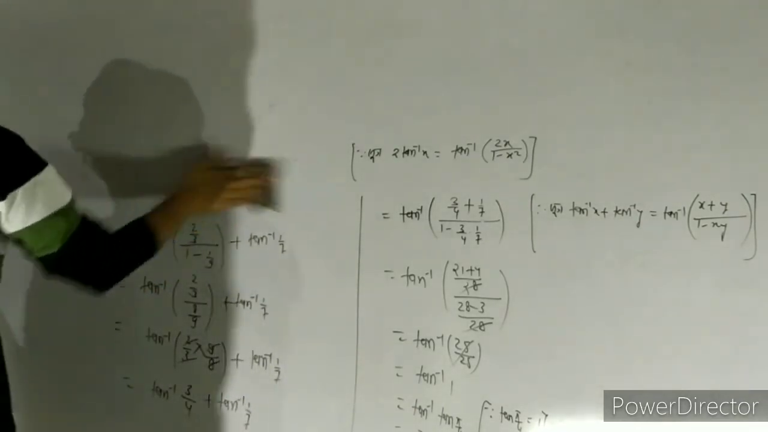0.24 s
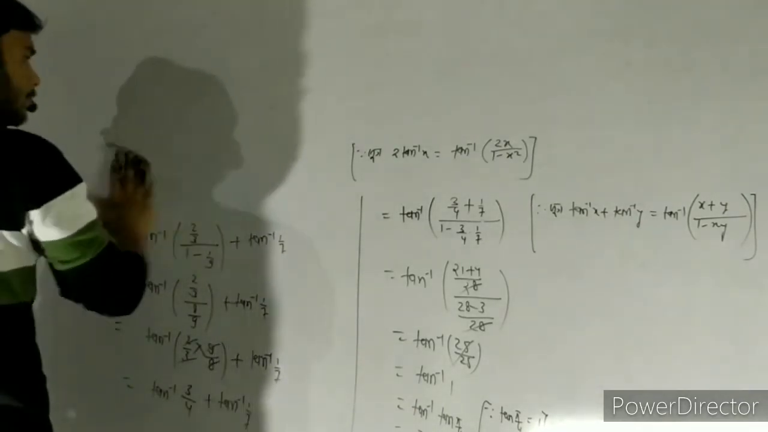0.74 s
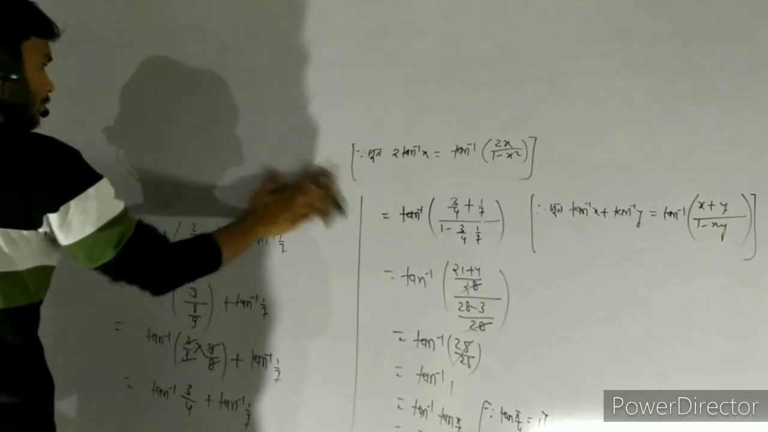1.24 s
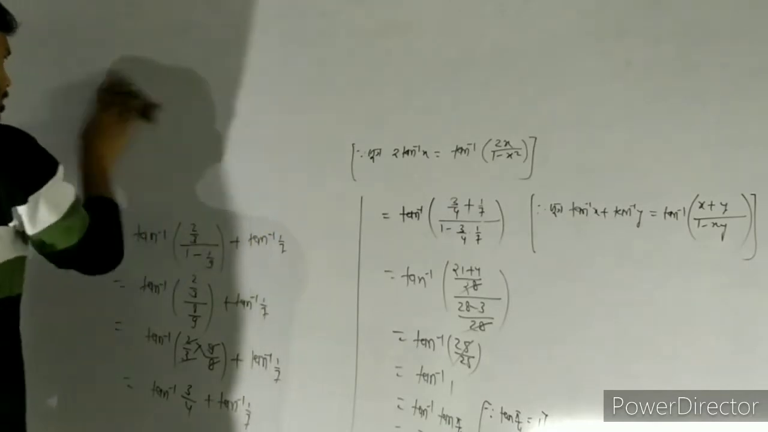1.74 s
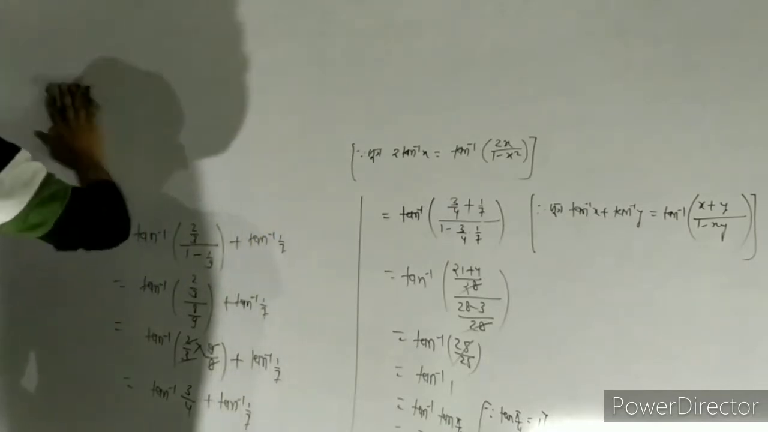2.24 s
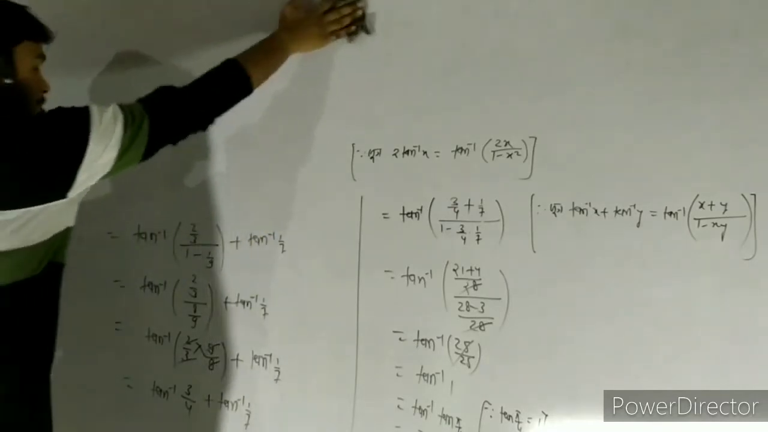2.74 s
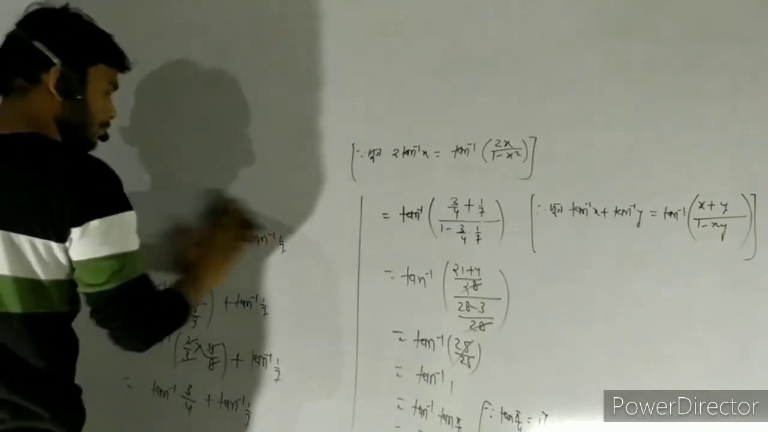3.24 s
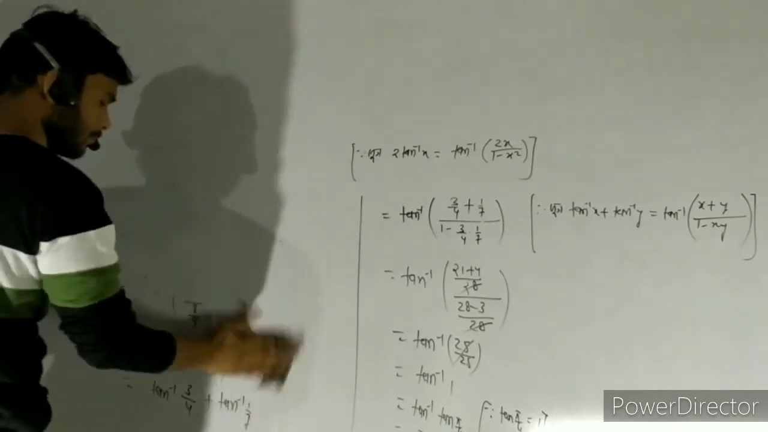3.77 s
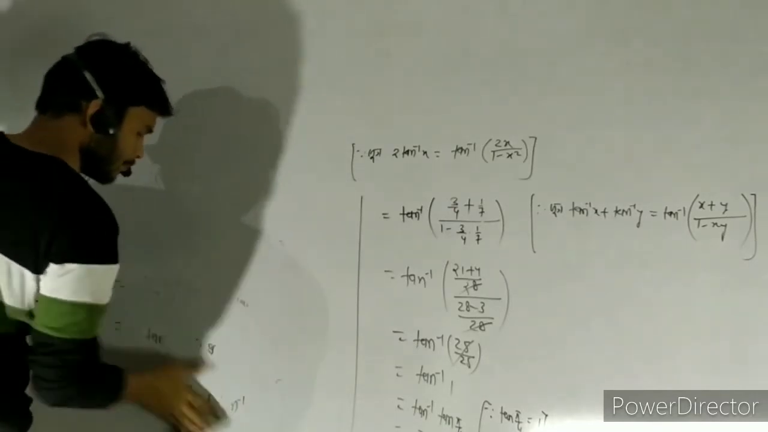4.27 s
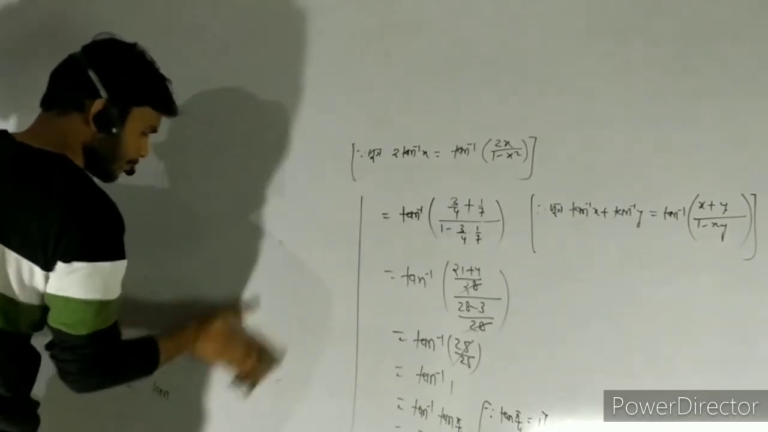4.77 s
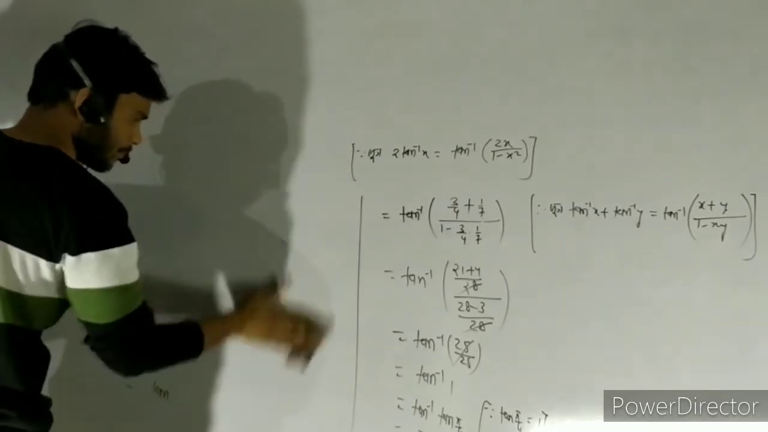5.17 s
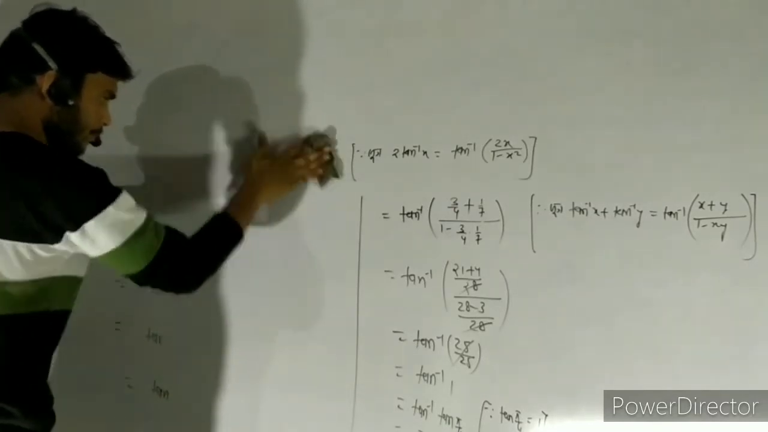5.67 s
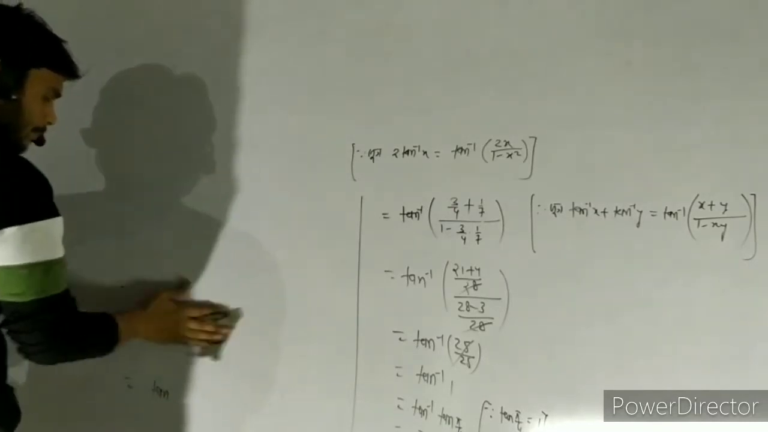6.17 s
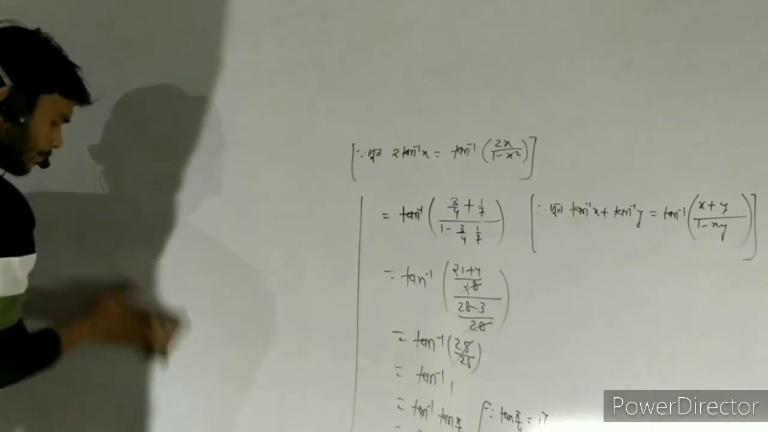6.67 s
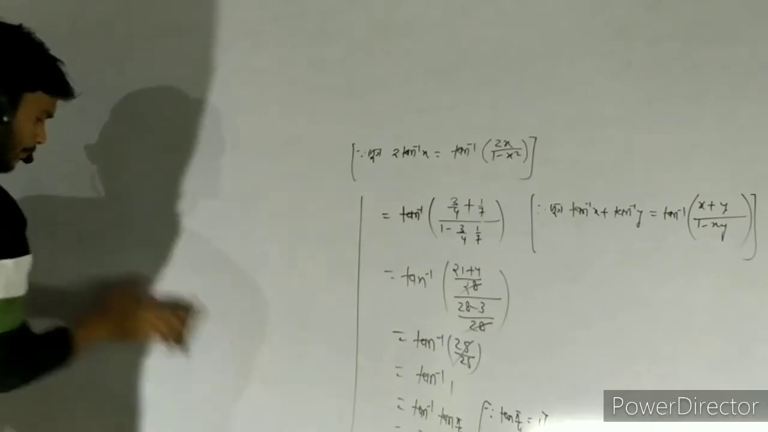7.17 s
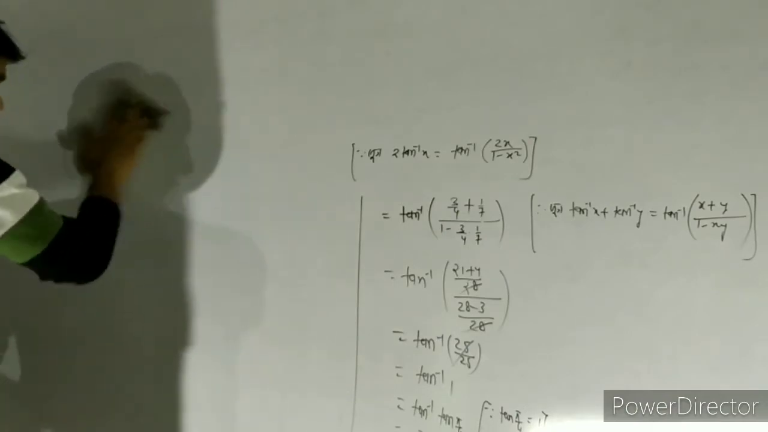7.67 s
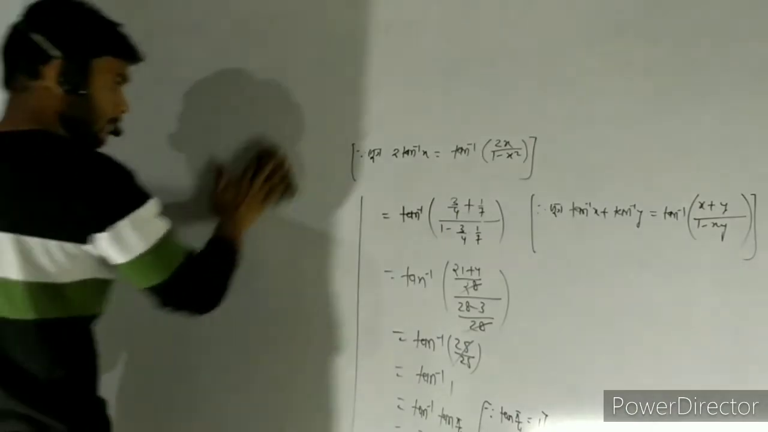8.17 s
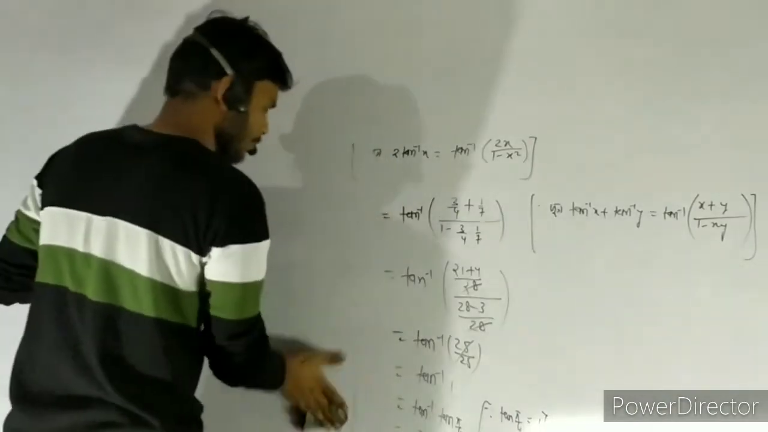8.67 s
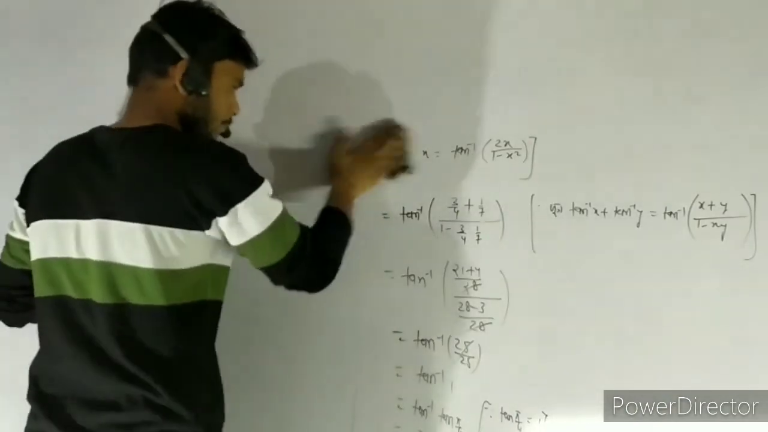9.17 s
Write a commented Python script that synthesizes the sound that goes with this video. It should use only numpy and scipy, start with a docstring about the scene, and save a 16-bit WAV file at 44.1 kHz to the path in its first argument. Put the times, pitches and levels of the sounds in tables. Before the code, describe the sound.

A cloth duster rubs a whiteboard in short, uneven strokes, each a dry hiss over the low, hollow resonance of the board. Light knocks and sharp ticks fall among the strokes. About two thirds through comes one brief harsh scrape, then the loudest flurry of scrubbing and knocking, before lighter wiping resumes. A small microphone worn by the person wiping picks it up closely, with faint hum and hiss in the pauses.

```python
"""A cloth scrubs a whiteboard in uneven strokes, heard through a small microphone worn by the wiper.
Stick-slip friction drives a low panel, its body and a hollow shell that resonates near 870 Hz,
while the cloth's fibres hiss in the treble. Knocks excite the same resonances impulsively.
Sharp ticks and one harsh scrape lie on top; a faint hum and hiss fill the pauses."""
import sys
import numpy as np
from scipy import signal
from scipy.fft import rfft, irfft, next_fast_len
from scipy.io import wavfile
from scipy.ndimage import uniform_filter1d, map_coordinates

SR = 44100
rng = np.random.default_rng(int(sys.argv[2]) if len(sys.argv) > 2 else 0)


def generate_wav(signal):
    """Clip the signal to [-1, 1] and save it as 16-bit WAV at the path in sys.argv[1]."""
    frames = np.transpose(np.atleast_2d(signal))
    scaled = np.clip(frames, -1, 1) * 32767
    pcm = np.round(scaled).astype(np.int16)
    wavfile.write(sys.argv[1], SR, pcm)


N = 414981

# Partials of the hum: pitch_hz, level_db
HUM_PARTIALS = [(199, -95), (590, -95.5)]
# Spectral shapes of the background hiss, scrape, panel, body and fibres: frequency_hz, density_db
FLOOR_SPECTRUM = [(18, -31.5), (30, -3.5), (368, 1), (588, 2), (670, -17), (826, -5), (15400, -17.5)]
SCRAPE_SPECTRUM = [(880, -49), (1500, -17), (1850, -1.5), (2480, -13.5), (3320, -40), (4010, -1.5),
                   (6000, -3.5), (7570, -14), (9000, -12), (12500, -26)]
PANEL_SPECTRUM = [(15, -49.5), (30, -21.5), (46, -6.5), (70, -2.5), (110, -9), (150, -17.5), (280, -44.5)]
BODY_SPECTRUM = [(50, -28), (95, -6.5), (135, -0.5), (220, -2.5), (400, -7), (600, -13.5), (1000, -55)]
FIBRE_SPECTRUM = [(1120, -29.5), (1900, -6), (2500, -8.5), (3160, -4), (3660, -7), (4840, -7.5), (6130, -2),
                  (7980, -6), (8940, -12), (11000, -13.5), (15400, -54)]
# Modes of the hollow shell: centre_hz, bandwidth_hz, gain_db
SHELL_MODES = [(880, 84.5, 2.5), (660, 412, -10), (1798, 210, -13), (1087, 343, -11)]
# One harsh drag: start_s, start_db, end_db
SCRAPE_DRAG = (6.452, -45.5, -37.5)
# Catches of the cloth: start_s, level_db, centre_hz, decay_ms
CLOTH_CATCHES = [(0.472, -43, 3400, 0.98), (1.0006, -34.5, 6300, 1.4), (1.4885, -38, 4800, 1),
                 (1.8095, -35.5, 4000, 0.8), (1.819, -24, 6200, 0.63), (2.149, -26.5, 6500, 0.24),
                 (2.3455, -36, 5070, 0.6), (3.217, -37.5, 6300, 0.65), (3.5061, -50, 2500, 1),
                 (4.062, -45, 2300, 0.8), (4.2293, -45, 2470, 0.8), (4.3445, -34, 2780, 1),
                 (4.516, -44, 2830, 1), (4.594, -40.5, 2300, 0.83), (5.7814, -44, 6900, 0.88),
                 (6.112, -48, 6000, 2.6), (6.1719, -38.5, 4800, 3.7), (6.24, -36.5, 6090, 16),
                 (6.754, -42.5, 5770, 1), (6.9706, -29, 6100, 5.4), (7.159, -26.5, 6090, 5.1),
                 (7.1806, -24, 6060, 6.1), (7.1972, -21, 6450, 2.16), (7.228, -14, 6200, 2.5),
                 (7.598, -40, 2060, 0.71), (7.703, -38.5, 7400, 4.4), (7.722, -40.5, 7730, 4),
                 (8.513, -30, 5880, 12), (8.897, -43.5, 4770, 1)]
# Knocks, with a thud gain for panel and body: start_s, level_db, thud_db
IMPACTS = [(0.472, -46.5, -6), (0.659, -54, 12), (1.236, -27.5, -11), (1.488, -37, -24), (2.148, -28, -8),
           (2.436, -25, 5), (2.449, -36.5, 22.5), (2.822, -53.5, 14), (3.19, -60, 11), (3.504, -37, -14),
           (4.228, -35.5, -16), (4.343, -25.5, -9), (5.782, -43, -5.5), (5.826, -47, 1.5),
           (6.198, -27, -15.5), (6.381, -23, -22), (6.452, -31, -11), (6.584, -20.5, -18),
           (6.756, -34.5, -21), (6.841, -37.5, 9), (6.888, -23, -13), (6.975, -17, 6), (7.02, -15.5, -9),
           (7.037, -13, -2), (7.139, -20, 0), (7.182, -15.5, -15), (7.197, -10.5, -2), (7.206, -15, -6.5),
           (7.231, -15, -17.5), (7.569, -35, -14), (7.596, -25, -9), (8.123, -35, 4), (8.453, -37, -6),
           (8.478, -36, 13.5), (8.511, -27, -2), (8.69, -39, -10), (8.894, -33.5, -4)]
# How strongly each part answers a knock: panel_db, body_db, shell_db
IMPACT_COUPLING = (14, 3, 11.5)
# Strokes of the cloth:
# start_s, length_s, hiss_db, swell_db, panel_above_hiss_db, shell_above_hiss_db, rise_db_per_s
WIPES = [(-0.029, 0.092, -56.5, -18.5, 3, 3, 120), (0.21, 0.15, -75, -9, -4, 5, 240),
         (0.38, 0.045, -75, 6, 6, 5, 460), (0.479, 0.082, -63, 0.5, -1, 3.0, 523),
         (0.675, 0.08, -73, 2, -5, 3.5, 770), (0.795, 0.18, -65.5, 13.5, 3.5, 4, 270),
         (1.019, 0.23, -50.5, 6, -5.5, 1.5, 244), (1.27, 0.12, -71.5, 23, 4.5, 0.5, 130),
         (1.507, 0.065, -50.5, -1.5, -4, 1, 540), (1.613, 0.02, -67, 2, 13.5, 1, 410),
         (1.714, 0.15, -56, -4.5, 4, 1, 204), (2.102, 0.12, -56.5, 3, 1.5, 0.5, 342),
         (2.36, 0.12, -50, 18.5, 2, 1, 478), (2.52, 0.22, -72, -18, 1, -1.5, 251),
         (2.855, 0.06, -65.5, -12, 4, -1, 410), (3.036, 0.071, -68.5, -16, 0.5, -4, 384),
         (3.218, 0.11, -62.5, 3, 4.5, 1.5, 442), (3.378, 0.086, -72, -22, 8, 0.5, 390),
         (3.442, 0.19, -69.5, 2.5, 4, -0.5, 270), (3.728, 0.19, -75, 7, 2, 0, 300),
         (4.034, 0.033, -62, -1, -4, 0, 640), (4.071, 0.086, -70, -4, -1, -0.5, 300),
         (4.233, 0.049, -61.5, 2.5, 1, 0.5, 618), (4.337, 0.12, -41, 6.5, -8, -3, 486),
         (4.508, 0.36, -64.5, -12, 5.5, 2.5, 432), (4.917, 0.18, -68, 9, 0, 0.5, 178),
         (5.158, 0.24, -82.5, -13, -15, -1.5, 803), (5.46, 0.058, -87.5, 17, -13, 0.5, 1050),
         (5.609, 0.017, -71, -1, 4, -1.5, 317), (5.807, 0.1, -74, -18.5, -0.5, 0.5, 425),
         (5.96, 0.1, -73.5, 24.5, -5, -4, 940), (6.109, 0.09, -56.5, 11.5, 4.5, 1, 888),
         (6.257, 0.18, -52, -14, -1.5, 3.5, 192), (6.456, 0.11, -52.5, 1, -3.5, 9.5, 690),
         (6.584, 0.038, -41.0, 3, -1, 3, 577), (6.658, 0.17, -63.5, -8, 5, 0.5, 1262),
         (6.847, 0.083, -50.5, 6.5, 9, 2.5, 338), (6.961, 0.08, -43, 15, 6, 5, 617.5),
         (7.137, 0.066, -41.5, 8, 14.5, 5, 821.5), (7.236, 0.068, -36, -15.5, 3, -2.5, 405),
         (7.416, 0.076, -75.5, -6, 5, 1, 256), (7.522, 0.13, -56.5, 10, -1.5, 0.5, 350),
         (7.707, 0.073, -52.5, 0.5, 5, 1, 912), (7.802, 0.094, -66.5, -11.5, 4.5, 1, 109),
         (8.077, 0.091, -54.5, 2, 6, 3, 228), (8.316, 0.1, -68, -6, -4.5, 1.5, 409),
         (8.483, 0.035, -48.0, 8, 6.5, 5, 383), (8.603, 0.1, -53, -7.5, 3.5, -0.5, 357),
         (8.794, 0.054, -66.5, -5, -2, -1.5, 320), (8.938, 0.11, -58.5, -21.5, 2.5, -1, 318),
         (9.077, 0.19, -63, 11.5, 2.5, -1.5, 340), (9.315, 0.077, -60.5, 4.5, 4, 5, 200)]

FLOOR_DB = -81
SWELL_S, SWELL_DB, SWELL_RISE_DB_PER_S, SWELL_FALL_DB_PER_S = 4.77, 21, 150, 26  # the hum's one swell
SCRAPE_S, CONTACT_S = 0.097, 0.00037  # durations of the drag and of a knock's push
FALL_RATIO = 0.84  # a stroke's rate of fall over its rate of rise
SHELL_DRIFT = 0.025  # share by which the shell's ringing pitch wanders at random
PRESSED_HZ, PRESSED_DB, PRESSED_LOSS = 4180, -55, 0.22  # hiss compression: corner, threshold, dB per dB
MIC_HZ, BAND_LIMIT_HZ = 11000, 15500


def amp(db):
    """Amplitude ratio of a level in decibels."""
    return 10 ** (np.asarray(db) / 20)


def unit(x):
    """Normalisation to an rms of 1."""
    return x / np.sqrt(np.mean(x ** 2) + 1e-20)


def wobble(rate_hz):
    """Random modulation: a spline through rate_hz Gaussian values a second."""
    knots = rng.standard_normal(int(N * rate_hz / SR) + 4)
    return map_coordinates(knots, [np.arange(N) * rate_hz / SR])


def filtered(x, response):
    """Linear filtering: the spectrum of x times a frequency response."""
    size = next_fast_len(N + SR // 2)
    return irfft(rfft(x, size) * response(np.fft.rfftfreq(size, 1 / SR)), size)[:N]


def causal(spectrum):
    """Minimum-phase response of unit power gain: it never precedes its excitation."""
    def response(hz):
        points_hz, db = np.transpose(spectrum)
        magnitude = amp(np.interp(np.log(hz + 1), np.log(points_hz + 1), db))
        cepstrum = irfft(np.log(magnitude + 1e-6))
        half = len(cepstrum) // 2
        gain = np.exp(rfft(np.r_[cepstrum[0], 2 * cepstrum[1:half], np.zeros(len(cepstrum) - half)]))
        return gain / np.sqrt(np.mean(abs(gain) ** 2))
    return response


def patchy(depth_db):
    """Modulated white noise: its gain varies in random patches of time and frequency."""
    spectra = signal.stft(rng.standard_normal(N), nperseg=256)[2]
    patches = uniform_filter1d(uniform_filter1d(rng.standard_normal(spectra.shape), 8, 0), 10, 1)
    return unit(signal.istft(spectra * amp(depth_db * unit(patches)), nperseg=256)[1][:N])


def grit(rate_hz, spread_db):
    """Shot noise: tiny slips at random moments, most small, a few large."""
    slips = rng.random(N) < rate_hz / SR
    sizes = amp(spread_db * np.minimum(rng.exponential(size=N), 3.5))
    return unit(slips * sizes * rng.choice([-1, 1], N))


def background():
    """Noise floor: faint hiss and a hum, modulated in amplitude and phase, that swells once."""
    t = np.arange(N) / SR
    hum = sum(amp(db + 4 * wobble(14)) * np.sin(2 * np.pi * hz * t + 2.4 * wobble(40))
              for hz, db in HUM_PARTIALS)
    below_peak_db = np.where(t < SWELL_S, SWELL_RISE_DB_PER_S, SWELL_FALL_DB_PER_S) * abs(t - SWELL_S)
    hiss = amp(FLOOR_DB + 1.4 * wobble(4.4)) * filtered(patchy(depth_db=5.0), causal(FLOOR_SPECTRUM))
    return hum * amp(np.maximum(SWELL_DB - below_peak_db, 0)) + hiss


def scrape():
    """Friction noise: one gritty drag that starts and stops abruptly."""
    start, start_db, end_db = SCRAPE_DRAG
    end = start + SCRAPE_S
    corners_s = [start - .002, start, end, end + 0.011]
    level_db = np.interp(np.arange(N) / SR, corners_s, [-120, start_db, end_db, -120])
    drag = unit(patchy(depth_db=1.5) + 0.27 * grit(1400, spread_db=3))
    return filtered(amp(level_db + 0.97 * wobble(125)) * drag, causal(SCRAPE_SPECTRUM))


def ticks():
    """Heavily damped oscillation: each catch drives a cycle or two with an impulse and a crackle."""
    sound, t = np.zeros(N + SR), np.arange(SR // 20) / SR
    for start_s, db, hz, decay_ms in CLOTH_CATCHES:
        push = 0.33 * rng.standard_normal(len(t)) * np.exp(-t / (decay_ms / 1e3))
        push[0] = -1
        cycles = hz * t[:128]
        click = np.sin(2 * np.pi * cycles) * 2.4 * cycles * np.exp(1 - 2.43 * cycles)
        tick = np.convolve(push, click - click.mean())[:len(t)]
        sound[round(start_s * SR):][:len(t)] += amp(db) * tick
    return sound[:N]


def knocks():
    """Impact forces on panel, body and shell: a push and a dying scuff, smoothed by the contact time."""
    force, t = np.zeros((4, N + SR)), np.arange(SR // 10) / SR  # the fibres' row stays zero
    for start_s, db, thud_db in IMPACTS:
        push = 0.099 * rng.standard_normal((3, len(t))) * np.exp(-t / 0.0049)
        push[:, 0] = -1
        part_db = np.add(IMPACT_COUPLING, [thud_db, thud_db, 0])
        force[:3, round(start_s * SR):][:, :len(t)] += amp(db + np.c_[part_db]) * push
    return uniform_filter1d(force[:, :N], round(CONTACT_S * SR), axis=1)


def shell_response(tuning):
    """Modal superposition: the shell's resonances, scaled in pitch; its soft mount passes little treble."""
    def response(hz):
        f = hz / tuning
        gain = sum((-1) ** k * amp(db) * 1j * f * width / (centre ** 2 - f ** 2 + 1j * f * width)
                   for k, (centre, width, db) in enumerate(SHELL_MODES))
        gain = gain / (1 + 1j * hz / 1300)
        return gain / np.sqrt(np.mean(abs(gain) ** 2))
    return response


def shell(force):
    """Forced resonance: the pitch wanders as the drive shifts at random between two tunings."""
    angle = np.pi / 4 * (1 + np.tanh(wobble(9)))
    flat = filtered(np.cos(angle) * force, shell_response(1 - SHELL_DRIFT))
    sharp = filtered(np.sin(angle) * force, shell_response(1 + SHELL_DRIFT))
    return flat + sharp


def stroke_envelope(above_hiss_db=0):
    """Incoherent addition: strokes sum in power; each rises, swells or fades, then falls."""
    t = np.arange(0, N, 128) / SR
    start, length, hiss_db, swell_db, *_, rise = np.transpose(WIPES)[..., None]
    progress = np.clip((t - start) / length, 0, 1)
    held_db = hiss_db + np.reshape(above_hiss_db, (-1, 1)) + swell_db * (progress - .5)
    edge_db = rise * (np.maximum(start - t, 0) + FALL_RATIO * np.maximum(t - start - length, 0))
    power = np.sum(amp(held_db - edge_db) ** 2, axis=0)
    return np.interp(np.arange(N) / SR, t, np.sqrt(power))


def fibres(force):
    """Compression: as the cloth is pressed harder, the low band of its hiss grows less than the top."""
    hiss = filtered(force, causal(FIBRE_SPECTRUM))
    low = filtered(hiss, lambda hz: 1 / (1 + (hz / PRESSED_HZ) ** 6))
    level_db = 20 * np.log10(stroke_envelope() + 1e-9)
    return hiss - low + low * amp(-PRESSED_LOSS * np.maximum(level_db - PRESSED_DB, 0))


def rubbing():
    """Stick-slip friction: one fluctuating grip modulates the forces on panel, body, shell and fibres."""
    *_, panel_db, shell_db, _ = np.transpose(WIPES)
    body_db = 0.36 * panel_db + 0.75 * shell_db  # the body lies between panel and shell
    grip = 0.47 * wobble(25) + 0.56 * wobble(80)
    snags = grit(200, spread_db=2.2)  # larger catches shake shell and fibres at once
    panel = unit(amp(1.3 * grip) * patchy(depth_db=2.86))
    body = unit(amp(2.5 * grip + 3.25 * wobble(25)) * rng.standard_normal(N))
    ring = unit(amp(1.93 * grip + 1.94 * wobble(60)) * (patchy(depth_db=1.5) + 0.54 * snags))
    flicker = amp(1.73 * grip + 0.53 * wobble(200))
    hiss = unit(flicker * (patchy(depth_db=3.0) + 0.5 * grit(700, spread_db=2.5) + 0.3 * snags))
    return np.array([stroke_envelope(panel_db) * panel, stroke_envelope(body_db) * body,
                     stroke_envelope(shell_db) * ring, stroke_envelope() * hiss])


def scene():
    """Superposition: all contact sounds, low-passed by the worn microphone, over the background."""
    on_panel, on_body, on_shell, on_fibres = rubbing() + knocks()
    panel = filtered(on_panel, causal(PANEL_SPECTRUM))
    body = filtered(on_body, causal(BODY_SPECTRUM))
    contact = panel + body + shell(on_shell) + fibres(on_fibres) + ticks() + scrape()
    microphone = signal.butter(4, MIC_HZ, fs=SR, output="sos")
    return (signal.sosfilt(microphone, contact) + background())[None]


def record(dry):
    """Band limiting: an ideal low-pass filter removes the highest treble."""
    return filtered(dry[0], lambda hz: hz < BAND_LIMIT_HZ)[None]


dry = scene()
out = record(dry)
generate_wav(out)
```